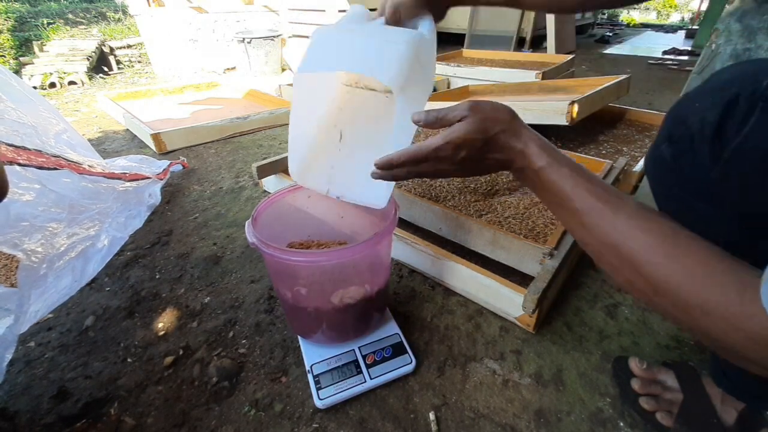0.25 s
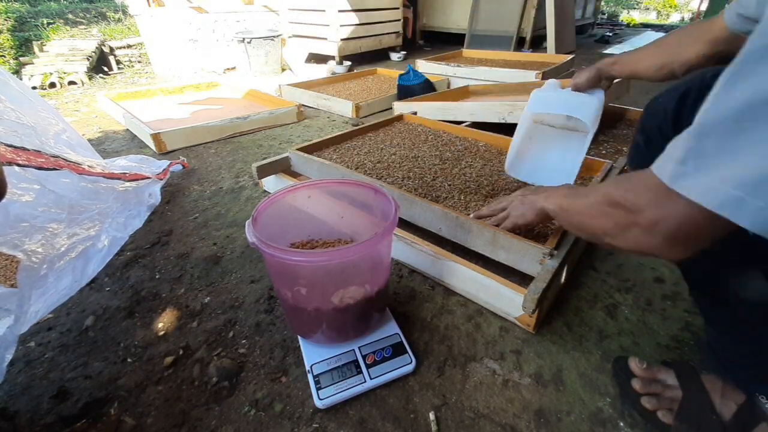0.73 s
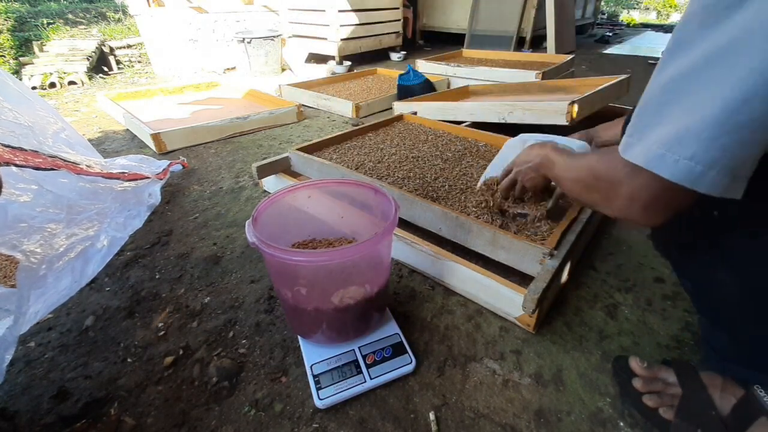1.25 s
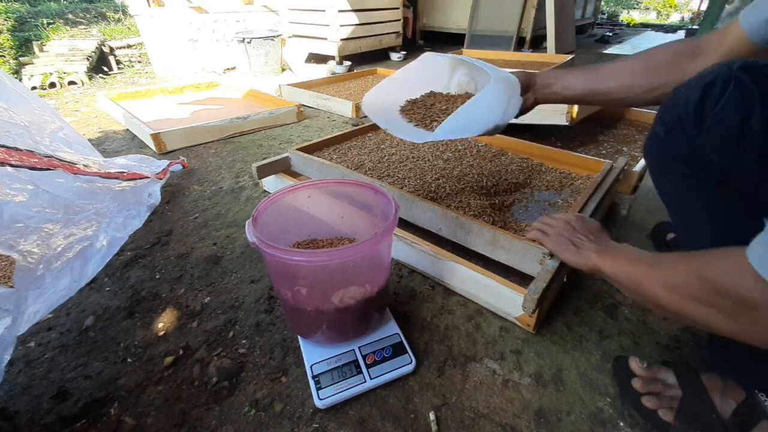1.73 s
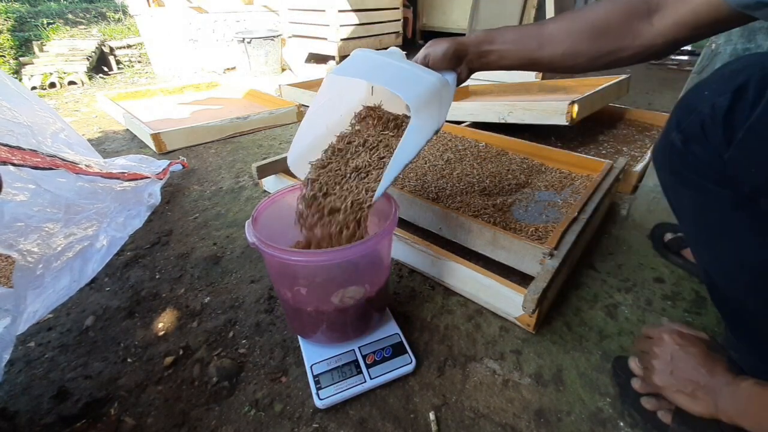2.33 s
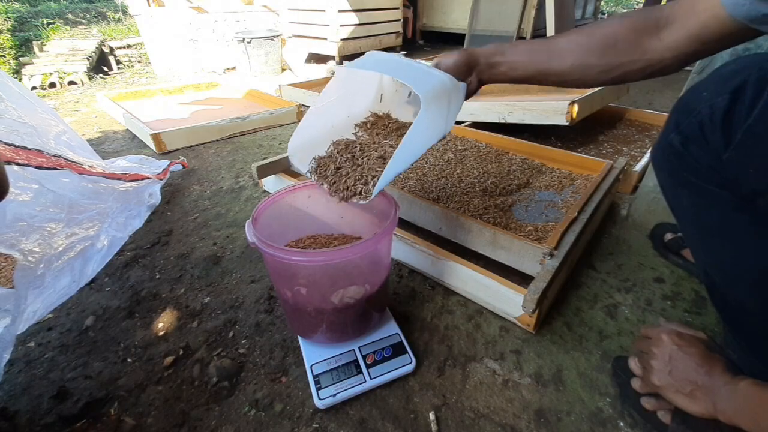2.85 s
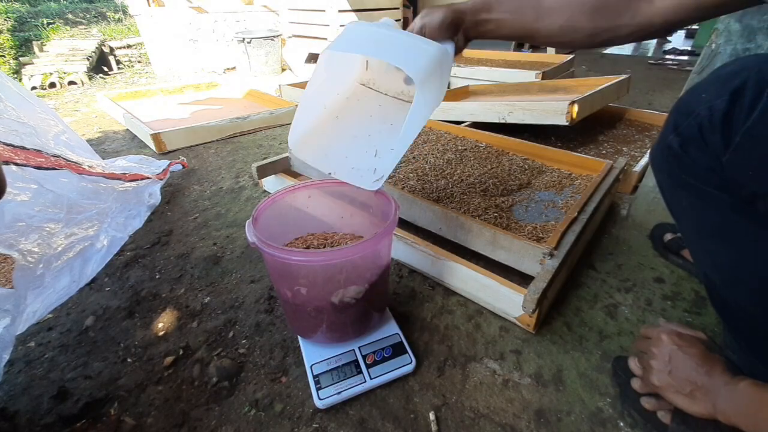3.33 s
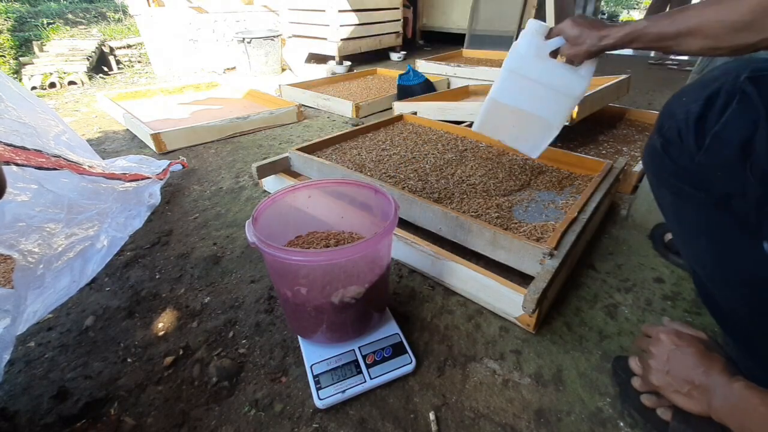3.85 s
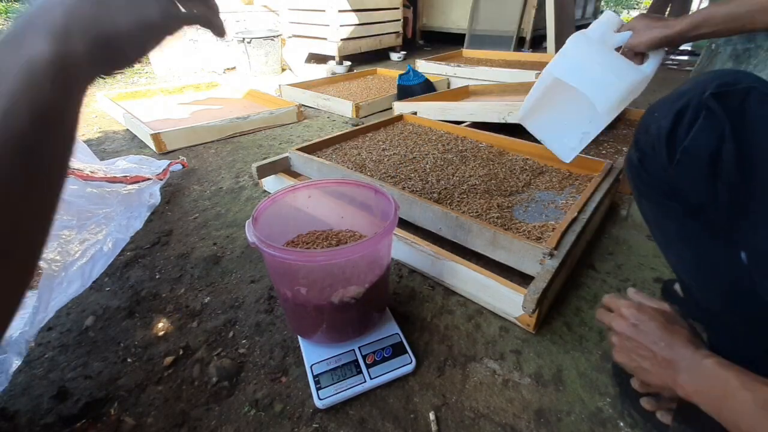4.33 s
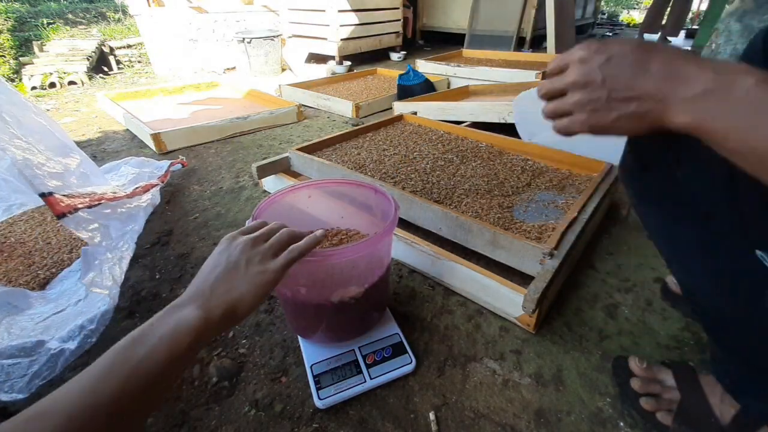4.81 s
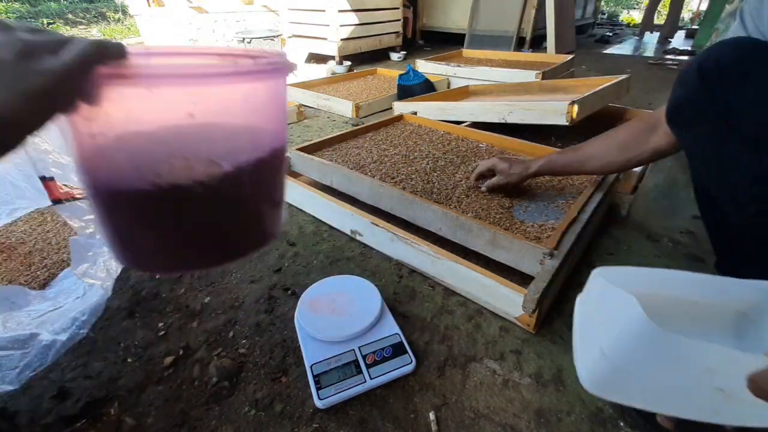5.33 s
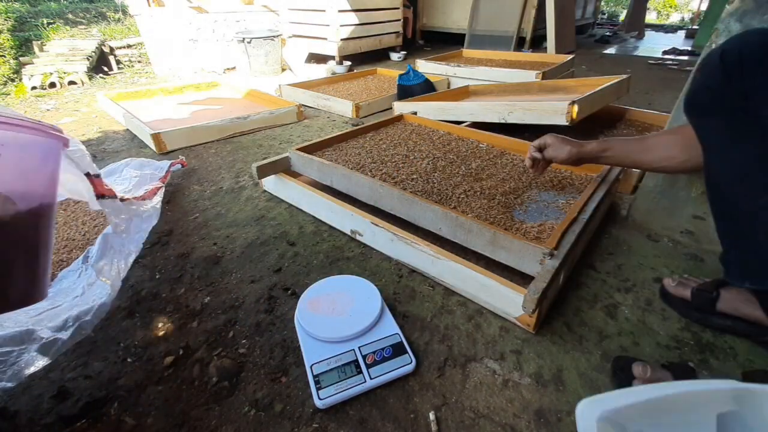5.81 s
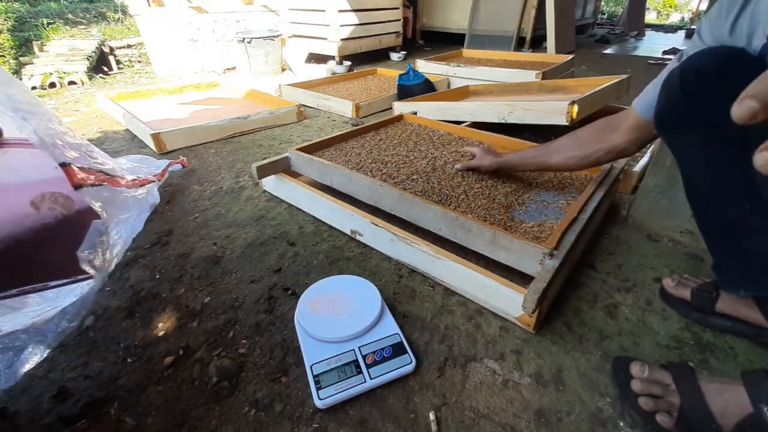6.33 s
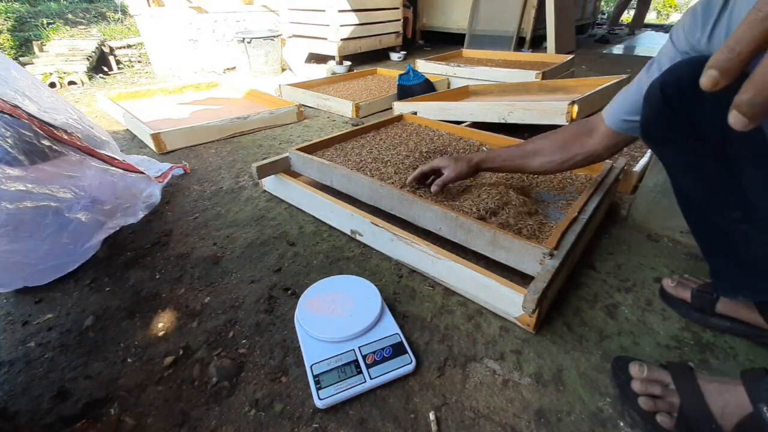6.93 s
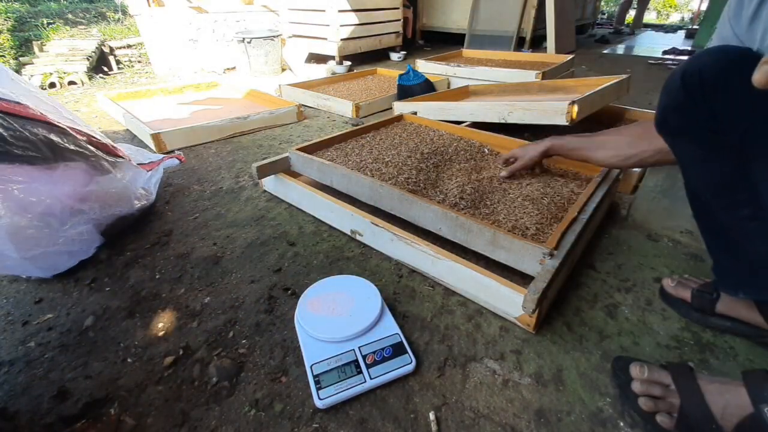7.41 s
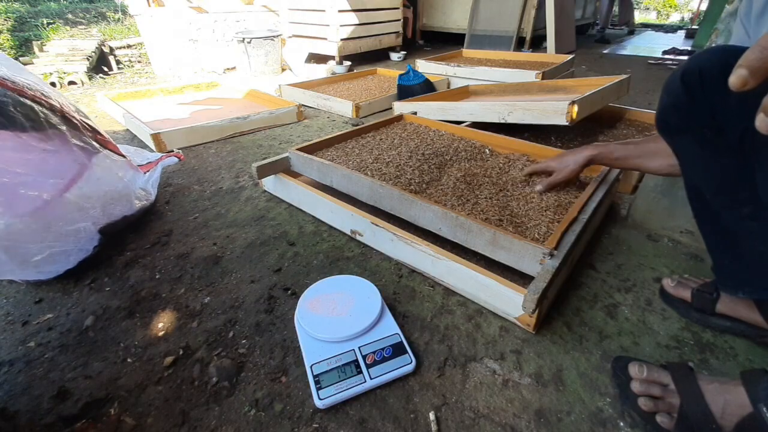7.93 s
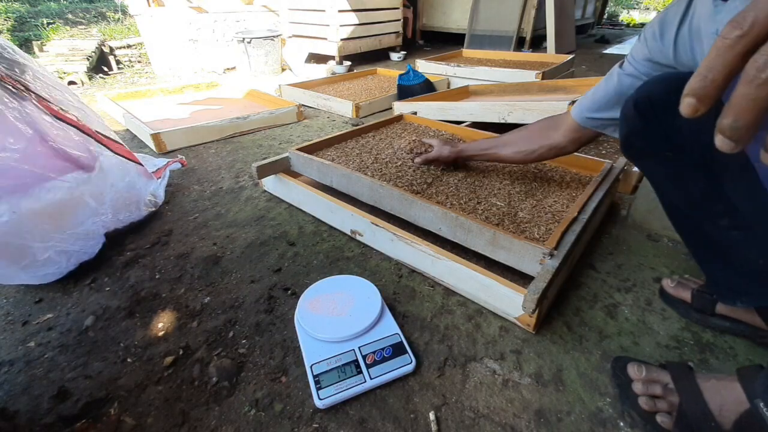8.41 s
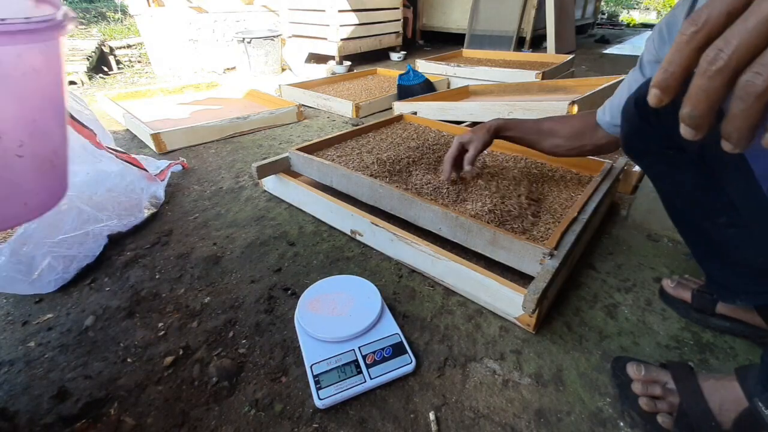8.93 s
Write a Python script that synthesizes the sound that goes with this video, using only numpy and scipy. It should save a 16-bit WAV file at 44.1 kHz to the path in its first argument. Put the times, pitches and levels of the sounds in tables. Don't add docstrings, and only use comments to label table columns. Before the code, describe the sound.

A hollow plastic jug scoops and pours dry rustling worms, then plastic clunks loudly before hands stir with crisp, gritty rustling over a faint outdoor machine drone.

```python
import sys
import numpy as np
from scipy import signal
from scipy.fft import rfft, irfft, next_fast_len
from scipy.io import wavfile
from scipy.ndimage import uniform_filter1d

SR = 44100
rng = np.random.default_rng(int(sys.argv[2]) if len(sys.argv) > 2 else 0)


def digitize_waveform(pressure):
    field = np.atleast_2d(pressure).T
    bounded = np.clip(field, -1, 1)
    quanta = np.round(bounded * 32767).astype(np.int16)
    wavfile.write(sys.argv[1], SR, quanta)


def invert_db(level):
    return 10 ** (np.asarray(level, dtype=float) / 20)


N = 404075
TIME = np.arange(N) / SR


def evened(x):
    return x / np.sqrt(np.mean(x ** 2) + 1e-20)


def wander(*spans):
    drift = rng.standard_normal(N)
    for span in spans:
        drift = uniform_filter1d(drift, span)
    return evened(drift)


def read(points, hz):
    f, value = np.transpose(points)
    return np.interp(np.log(hz + 1), np.log(f + 1), value)


def column(rows, index):
    return np.interp(TIME, *np.vstack(rows).T[[0, index]])


def panned(x, pan_db):
    return x * invert_db(np.array([pan_db / 2, -pan_db / 2]).reshape(2, -1))


def add(mix, s, sound):
    part = mix[:, max(round(s * SR), 0):][:, :sound.shape[1]]
    part += sound[:, :part.shape[1]]


def coloured(x, points):
    size = next_fast_len(x.shape[-1])
    gain = invert_db(read(points, np.fft.rfftfreq(size, 1 / SR)))
    return irfft(rfft(x, size) * gain, size)[..., :x.shape[-1]]


def resonate(x, hz, width):
    turn = np.exp(2j * np.pi * np.cumsum(hz * np.ones(x.shape[-1])) / SR)
    r = np.exp(-np.pi * width / SR)
    return 2 * (turn * signal.lfilter([1 - r], [1, -r], x / turn)).real


def pair(x, same):
    same = np.clip(same, -1, 1)
    return np.array([x[0], same * x[0] + np.sqrt(1 - same ** 2) * x[1]])


# pitch_hz, level_db (per Hz)
AIR = [(20, -35), (31, -30), (50, 9.5), (200, 5), (400, -5.5), (630, -13.5), (1000, -22.5), (2000, -36.5),
       (4000, -32), (8500, -27), (12000, -29.5), (14000, -45), (16500, -38)]
# pitch_hz, likeness (-1 to 1)
AIR_LIKENESS = [(60, .92), (300, .75), (1000, .2), (3000, -.1), (15000, .02)]
# pitch_hz, width_hz, level_db
DRONE = [(48, 41, -8.5), (94, 15, -8.5), (122.8, 12.6, -1), (166.4, 9.8, -7), (258, 14.2, -4),
         (328.2, 26.5, -7)]
# start_s, level_db
DRONE_LEVEL = [(0.0, -39), (0.8, -46.5), (1.0, -43.5), (2.32, -43), (2.5, -46), (3.7, -48.5), (4.1, -50),
               (5.6, -44.5), (6.1, -41.5), (6.7, -49.5), (7.24, -41), (7.6, -43.5), (8.5, -43.5),
               (9.16, -43)]
# pitch_hz, width_hz, level_db
INSECTS = [(6750, 700, -68.5), (11200, 880, -85)]


def yard():
    hz, t, z = signal.stft(rng.standard_normal((2, N + 2048)), SR, nperseg=1024, noverlap=768)
    patches = uniform_filter1d(rng.standard_normal(z.shape[1:]), 12, 0)
    patches = evened(uniform_filter1d(patches, 14, 1))
    z = pair(z, read(AIR_LIKENESS, hz)[:, None]) * invert_db(read(AIR, hz)[:, None] + 1.5 * patches)
    air = invert_db(-54) * evened(signal.istft(z, SR, nperseg=1024, noverlap=768)[1][:, :N])

    push = pair(rng.standard_normal((2, N)), 0.61)
    pitch_drift = 1 + 0.028 * wander(9000, 9000)
    drone = 0
    for hz, width, db in DRONE:
        hum = resonate(resonate(push, hz * pitch_drift, width), hz, 3.8 * width)
        drone = drone + invert_db(db) * evened(hum)
    drone = invert_db(column(DRONE_LEVEL, index=1) - 3.5) * evened(drone)

    hiss = pair(rng.standard_normal((2, N)), 0.13)
    insects = 0
    for hz, width, db in INSECTS:
        insects = insects + invert_db(db) * evened(resonate(resonate(hiss, hz, width), hz, width))
    return air + drone + insects


# start_s, level_db, lowest_hz, swing_hz
CHURR = [(9.055, -76, 4370, 300), (9.06, -63, 4300, 786), (9.064, -58, 3590, 1800),
         (9.08, -53.5, 3580, 1751), (9.1, -55, 3580, 1700), (9.124, -52.5, 3560, 1400),
         (9.13, -58, 3850, 900), (9.16, -69, 3750, 500)]
TRILL_HZ, EDGE_HZ = 168, 3480


def bird():
    turns = np.cumsum(TRILL_HZ + 500. * uniform_filter1d(rng.standard_normal(N), 200)) / SR
    swing = 1 - abs(np.sin(np.pi * turns))
    hz = column(CHURR, index=2) + column(CHURR, index=3) * swing ** 0.98
    level_db = column(CHURR, index=1) - 3 * swing
    note = np.sin(2 * np.pi * np.cumsum(hz) / SR) * (TIME > CHURR[0][0]) * invert_db(level_db)
    echoes = rng.standard_normal((2, 1500)) * np.exp(-np.arange(1500) / 300.0)
    echoes = 1.9 * echoes / np.linalg.norm(echoes[0])
    note = 0.9 * note + signal.oaconvolve(note[None], echoes, axes=1)[:, :N]
    return signal.sosfilt(signal.butter(8, EDGE_HZ, "high", fs=SR, output="sos"), note)


# start_s, pitch_hz, level_db
SQUEAKS = [
    [(3.365, 11369, -78), (3.375, 11345, -69), (3.417, 11502, -69), (3.47, 10638, -81)],
    [(5.11, 11600, -73), (5.14, 12100, -70), (5.17, 11700, -70), (5.215, 11200, -76)],
    [(4.945, 1310, -79), (4.97, 1330, -78), (5.005, 1310, -74)],
    [(0.742, 15600, -80), (0.76, 15650, -81), (0.785, 15600, -84)],
    [(0.85, 15650, -78), (0.862, 15500, -75), (0.88, 15550, -80)],
    [(9.044, 2950, -78), (9.05, 3000, -68.5), (9.056, 3050, -77), (9.085, 3100, -83)],
]


def squeak(rows):
    jitter = 1 + .08 * uniform_filter1d(rng.standard_normal(N), 90)
    tone = np.sin(2 * np.pi * np.cumsum(column(rows, index=1) * jitter) / SR)
    gate = np.clip(np.minimum(TIME - rows[0][0], rows[-1][0] - TIME) / .008, 0, 1)
    return panned(tone * gate * invert_db(column(rows, index=2) + 6.5), .5)


def scrape(s, db, hz, length_s, shares):
    t = np.arange(6000) / SR
    grit = pair(rng.standard_normal((2, len(t))) * invert_db(0.5 * rng.exponential(1, len(t))), 0.67)
    grit = evened(resonate(resonate(grit, hz, shares[0] * hz), hz, shares[1] * hz))
    return s, invert_db(db) * grit * np.minimum(t / 0.0016, 1) * np.exp(-(t / length_s) ** 2)


# start_s, level_db, pitch_hz,
# length_s
RIM_SCRAPES = [(0.029, -51, 620, 0.033), (0.346, -49, 905, 0.012), (0.402, -55, 980, 0.026),
               (0.501, -57, 1150, 0.0063), (0.78, -68, 1490, .02), (0.854, -50, 1430, .02),
               (0.87, -49.5, 504, 0.13), (0.985, -46.5, 1460, 0.043), (1.042, -52, 1900, 0.027),
               (3.311, -58, 1500, 0.024), (4.155, -32, 1050, 0.009), (6.108, -36, 1510, 0.0097),
               (6.109, -32.5, 2800, 0.0076), (6.327, -52, 1200, .015), (7.188, -47, 2340, 0.061),
               (7.304, -46.5, 2020, 0.16), (8.094, -58, 1700, 0.057), (8.157, -52, 1200, 0.093)]
# start_s,
# level_db, pitch_hz, length_s
HOLLOW_RUBS = [(0.215, -55, 475, .12), (0.235, -58, 1100, 0.026), (4.57, -24.5, 527, 0.017),
               (4.6, -48, 556, 0.018), (4.69, -43, 157, 0.034), (6.166, -36.5, 500, 0.016),
               (6.222, -50, 460, 0.038), (6.322, -38.5, 470, 0.043), (7.186, -35.5, 329, 0.041),
               (7.288, -40.5, 300, .05), (4.186, -36, 510, 0.033), (4.2, -41.5, 226, 0.036),
               (6.02, -20, 996, .008), (6.047, -31, 400, .022), (5.806, -42, 1170, 0.015),
               (7.2, -40.5, 150, 0.056), (1.003, -53, 900, 0.048), (1.41, -60, 2600, 0.05),
               (7.772, -51, 320, 0.025)]
# start_s, level_db, pitch_hz, length_s
SACK_WHISTLES = [(7.227, -46.5, 2640, 0.042), (7.238, -55, 1350, .03), (7.312, -47, 2750, 0.032),
                 (7.361, -44, 1240, 0.033), (7.361, -46.5, 3250, 0.035), (7.365, -54, 1930, .03),
                 (7.406, -50, 1240, 0.053), (7.408, -52, 2560, 0.031), (7.417, -54, 1900, .025)]


def scrapes(mix):
    broad, narrow, fine = (0.17, 2.6), (0.17, 0.23), (0.035, 0.08)
    for rows, shares in [(RIM_SCRAPES, broad), (HOLLOW_RUBS, narrow), (SACK_WHISTLES, fine)]:
        for row in rows:
            add(mix, *scrape(*row, shares))


def tick(s, peak_db, hz, body_db):
    t = np.arange(1500) / SR
    puff = pair(rng.standard_normal((2, len(t) + 1)), 0.3)[:, 1:]
    edge = resonate(resonate(puff, hz, 0.62 * hz), hz, 2.0 * hz)
    edge = edge * np.minimum(t / 0.002, 1) * (np.exp(-t / 0.0044) + 0.26 * np.exp(-t / 0.006))
    body = resonate(resonate(puff * np.exp(-t / 0.0022), 850.0, 760.0), 970.0, 1220.0)
    sound = edge / abs(edge).max() + invert_db(body_db + 10.5) * body / abs(body).max()
    return s, invert_db(peak_db - 3.5) * sound


# start_s, peak_db, body_db (over the snap)
NAIL_TICKS = [(0.0394, -42, -8), (0.09, -41, -18), (0.1313, -41, -16), (0.2763, -42, -12),
              (0.3527, -29.5, -9.5), (0.4992, -44, -10), (0.905, -38, -22), (1.351, -39, -25),
              (1.801, -34.5, -21), (4.157, -45, -23.5), (4.485, -31, -23), (4.5475, -25, 1.5),
              (4.701, -35.5, -26), (5.214, -34, -35), (5.5244, -33, -20), (5.7603, -31.5, -18),
              (6.201, -31.5, -23), (6.318, -34, -19), (6.353, -31, -25), (7.7274, -28.5, -15)]
WALL_TICKS = [(1.0022, -44, -4), (1.113, -44.5, 9.5), (4.158, -28.5, 1), (4.6463, -35, 6), (5.011, -42, -8),
              (5.092, -50.5, 11.5), (5.446, -29, -23), (5.718, -34.5, -15), (6.0224, -19.5, 9.5),
              (6.109, -30, 11.5), (6.328, -39, 8), (7.189, -29, -23), (7.783, -37, -11), (8.092, -33, -21)]
SACK_TICKS = [(1.918, -35, -23), (4.769, -30.5, -47), (5.6292, -33.5, -23), (8.7123, -23, -19),
              (8.965, -41.5, -22.5)]


def ticks(mix):
    for hz, rows in [(7460, NAIL_TICKS), (2830, WALL_TICKS), (10900, SACK_TICKS)]:
        for s, peak_db, body_db in rows:
            add(mix, *tick(s, peak_db, hz, body_db))


def blow(modes, s, peak_db, crack_db, damping, rattle_s, push_db):
    t, lead = np.arange(7000) / SR, .02
    late, early = np.maximum(t - lead, 0), np.maximum(lead - t, 0)
    ring = 0
    for hz, db, t60 in modes:
        swell = 1 - np.exp(-.9 * hz * t)
        detune = rng.uniform(0.99, 1.01) + rng.normal(0, hz * .4e-5, (2, 1))
        ring = ring + invert_db(db - 60 * t * damping / t60) * swell * np.sin(2 * np.pi * hz * detune * t)
        ring = ring + invert_db(db - 12 - 58 * t * damping / t60) * swell * np.sin(2 * np.pi * hz * .96 * t)
    full = np.exp(-((late - 0.1483 * rattle_s) / 0.00021) ** 2)
    rattle = 0.1 * rng.standard_normal(len(t)) * np.exp(-early / 0.0084 - late / rattle_s)
    ring = signal.fftconvolve(ring, (full + rattle)[None], axes=1)[:, :len(t)]
    lowest_hz = modes[0][0]
    ring = signal.sosfilt(signal.butter(2, 0.5 * lowest_hz, "high", fs=SR, output="sos"), ring)
    ring = ring * (1 + 0.95 * np.exp(-late / 0.0089))
    dipped = signal.lfilter(*signal.iirnotch(762, 3.5, SR), ring)
    ring = ring + 0.92 * (dipped - ring)

    push = np.exp(-early / 0.0057 - late / 0.013) * np.sin(2 * np.pi * 0.65 * lowest_hz * (t - lead))
    crack = pair(rng.standard_normal((2, len(t))), 0.44) * np.exp(-early / 0.00051)
    crack = crack * (np.exp(-late / 0.0037) + 0.13 * np.exp(-late / 0.014))
    crack = coloured(crack, [(400, 2), (1200, 12.5), (3000, 8.5), (8000, 3.5), (16000, -13.5)])
    sound = ring / abs(ring).max() + invert_db(push_db) * push + invert_db(crack_db) * crack
    return s - lead, panned(invert_db(peak_db) * sound, 0.4)


def strike(mix, modes, rows, rattle_s, push_db):
    for row in rows:
        add(mix, *blow(modes, *row, rattle_s, push_db))


# pitch_hz, level_db, decay_s (60 dB)
TRAY = [
    (76.5, 12, 0.051),
    (150.4, 9.5, 0.048),
    (257, -4, 0.082),
    (428, -11.5, 0.17),
    (629, -21, 0.25),
    (1144, -17, 0.046),
]
# start_s, peak_db, crack_db (over the ring), damping (factor)
TRAY_BLOWS = [(0.778, -38.5, -34, 2.3), (1.003, -35, -36, 1.9), (1.402, -19, -41, 1.3),
              (3.824, -38.5, -14, 0.3), (4.15, -23.5, -45, .6), (4.225, -42, -43, 0.45),
              (4.274, -37.5, -45, .6), (4.536, -28.5, -45, 0.62), (6.191, -42, -45, 0.32)]


def tray(mix):
    strike(mix, TRAY, TRAY_BLOWS, rattle_s=0.0111, push_db=-13.5)


# pitch_hz, level_db, decay_s (60 dB)
TUB = [(160, -7.5, 0.24), (265, -13.5, 0.09), (360, -4.5, 0.099), (402, 1, 0.2), (490, 7.5, 0.11),
       (627, -13.5, 0.17), (985, -15, 0.033), (1140, -7, 0.072), (1180, -25, .045), (1400, -21, 0.06),
       (1700, -9, 0.039), (2340, -14, 0.04)]
TUB_RIM = [(302, -9, .08), (400, -8.5, 0.17), (479, -0.5, 0.081), (620, -4.5, 0.067), (787, -5.5, .07),
           (1125, -4.5, 0.044), (1360, -3.5, .04), (1795, -20, 0.046), (3100, -26, .02)]
LID = [(127, -13.5, 0.13), (287, -3.5, 0.048), (470, -10, 0.066), (810, -9, 0.044), (1180, -17, 0.018),
       (1674, -21, .05)]
# start_s, peak_db, crack_db (over the ring), damping (factor)
TUB_BLOWS = [
    (5.984, -28.5, -40, 0.54),
    (6.001, -26.5, -32, 1.2),
    (6.024, -5, -18.5, 1.74),
    (6.045, -24, -40, 0.66),
    (6.168, -34.5, -30, 2.4),
    (6.224, -37, -28, 0.63),
    (6.283, -35, -30, 1.8),
]
RIM_BLOWS = [
    (6.1, -29, -35, 1.4),
    (6.11, -13, -48, 1.6),
    (6.121, -37, -38, 1.1),
]
LID_BLOWS = [
    (5.803, -31, -40, 1.5),
    (5.812, -24, -40, 1.6),
]


def tub(mix):
    for modes, rows in [(TUB, TUB_BLOWS), (TUB_RIM, RIM_BLOWS), (LID, LID_BLOWS)]:
        strike(mix, modes, rows, rattle_s=0.01347, push_db=-39)


# pitch_hz, level_db, decay_s (60 dB)
JUG_SIDE = [(152, 0.5, 0.16), (313, 1, 0.076), (403, 1.5, 0.14), (491, 5.5, 0.12), (550, -17, 0.13),
            (984, -18, 0.077), (1184, -11.5, 0.09), (1645, -19, 0.049), (1760, -20, 0.073),
            (2350, -33, .05)]
JUG_BASE = [(122.7, -4, 0.071), (190, -4.5, 0.085), (238, -5.5, 0.087), (300, -5, 0.094), (398, -3.5, 0.17),
            (502, -5.5, 0.073), (556, 2.5, 0.11), (685, -11, .08), (855, -10, 0.11), (1065, -18, 0.073),
            (1123, -5, 0.043), (1200, -8.5, 0.054), (1580, -15, 0.072), (1955, -11, 0.04)]
JUG_HEEL = [(210, -3.5, 0.082), (314, -6.5, 0.1), (490, -5.5, 0.11), (542, -2, 0.11), (840, -23, 0.04),
            (1100, -7.5, 0.059), (1604, -26, 0.061), (2010, -7, 0.036)]
# start_s, peak_db, crack_db (over the ring), damping (factor)
SIDE_BLOWS = [(0.855, -29.5, -26, 2.1), (1.048, -41, -15, 1.2), (1.115, -29, -10.5, 2.3),
              (4.161, -10, -18, 1.2), (4.172, -18, -20, 1.6), (5.016, -30.5, -23, 1),
              (5.032, -36, -24, 1.7), (5.046, -46, -19, 2.3), (6.326, -36, -29, 1.1),
              (6.35, -29.5, -31, 5.1)]
BASE_BLOWS = [
    (1.362, -35, -35, 3.6),
    (4.548, -5, -22, 1.2),
    (4.572, -29, -38, 0.82),
    (4.585, -35, -33, 1.5),
    (0.098, -52, -45, 1.5),
    (0.122, -52, -45, 1.5),
    (8.443, -43, -8, 0.77),
]
HEEL_BLOWS = [
    (4.647, -12.5, -23.5, 1.28),
    (0.5, -43.5, -33, 1),
    (5.093, -40, -20, 1.8),
]


def jug(mix):
    strike(mix, JUG_SIDE, SIDE_BLOWS, rattle_s=0.0139, push_db=-15)
    for modes, rows in [(JUG_BASE, BASE_BLOWS), (JUG_HEEL, HEEL_BLOWS)]:
        strike(mix, modes, rows, rattle_s=0.01024, push_db=-17)


# start_s (of the peak), level_db (dull slide), bright_db, rise_s, fall_s
SCOOPS = [(0.0, -58, -3.5, .1, 0.74), (0.25, -67, -6, 0.054, 0.047), (0.284, -61.5, 3.5, 0.092, 0.1),
          (0.356, -54, 4, 0.0085, 0.11), (0.794, -59, -2.5, 0.02, 0.06), (0.9, -57, -2.5, 0.042, 0.39),
          (1.1, -48.5, -3, 0.21, 0.083), (1.255, -53, 0, 0.55, 0.09), (1.61, -58.5, 2, 0.48, 0.066),
          (3.32, -69, -12, 0.054, 0.032), (3.86, -57, 1, 0.12, 0.86), (4.12, -62.5, 9, 0.65, 0.072),
          (4.2, -48, 1.5, 0.19, 0.069), (4.3, -53.5, 3.5, 0.27, 1), (5.036, -45.5, -4, 0.022, 0.037),
          (5.094, -57, -4, 0.0078, 0.15), (6.33, -42, -26, 0.028, 0.14)]
POURS = [(1.44, -41, 2, 0.14, 0.075), (2.19, -56.5, 5, 0.064, 0.5), (2.27, -54.5, 3.5, 0.38, 0.26),
         (2.32, -47, 0.5, 0.36, 0.21), (2.45, -71, 3, 0.16, 0.22), (2.92, -70, 6, 0.12, 0.04),
         (3.07, -50.5, -2, 0.045, 0.23), (3.12, -47.5, 2.5, 0.12, 0.16), (3.17, -46.5, 4, 0.18, 0.14),
         (3.22, -54, 6, 0.17, 0.085)]
STIRS = [(5.46, -48.5, 3.5, 0.084, 0.1), (5.86, -46.5, -2, 0.22, 0.17), (5.93, -41.5, -9, 0.068, 0.047),
         (6.03, -44.5, -0.5, 0.24, 0.16), (6.21, -49.5, -4, 0.072, 0.29), (6.44, -48, -1.5, 0.17, 0.2),
         (7.016, -44.5, -2.5, 0.37, 0.42), (7.21, -40.5, -5.5, 0.036, 0.32),
         (7.42, -45.5, -0.5, 0.52, 0.11), (7.656, -49, -1.5, 0.3, 0.094), (7.826, -48.5, -2, 0.18, 0.29),
         (7.96, -53, -1.5, 0.12, 0.061), (8.052, -45, -2.5, 0.017, 0.03), (8.104, -43, -4.5, 0.041, 0.057),
         (8.3, -52.5, 4.5, 0.45, 0.95), (8.46, -38, -1.5, 0.23, 0.14), (8.512, -39, -0.5, 0.1, 0.4),
         (8.715, -41, -5, 0.019, 0.067), (8.89, -52, 1.5, 0.39, 0.076), (8.976, -53, -6, 0.025, 0.033)]
BRUSHES = [(1.74, -70, 2.5, 0.03, 0.36), (1.82, -65, 0.5, 0.19, 0.21), (1.96, -71, -1, 0.13, 0.04),
           (1.92, -76, 12.5, 0.012, 0.039), (3.72, -67, 1, 0.38, 0.25), (4.53, -69, 0, 0.048, 0.4),
           (4.72, -71.5, 3.5, 0.08, 0.33), (4.87, -68, 1.5, 0.12, 0.037), (5.68, -66, 1.5, 0.096, 0.31),
           (6.37, -54, 1, 0.023, 0.026), (5.274, -59.5, 1, 0.12, 0.1)]
# fizz_db and crisp_db over the slide, lean (crisp dB per dB of brightness)
SCOOP_SKIN, POUR_SKIN = (-7, -12.5, 1.7), (-7, -15, 1.7)
STIR_SKIN, BRUSH_SKIN = (-3, -4.5, 1.27), (3.7, 2.7, 2.2)
SLOPE_DB, BEND = 20, 0.99
HANDS_LIFT_S, LIFT_S, LIFT_DB = 8.98, 0.018, -5


def strokes():
    t, power = TIME[::64], 1e-11
    for rows, (fizz_db, crisp_db, lean) in [(SCOOPS, SCOOP_SKIN), (POURS, POUR_SKIN),
                                            (STIRS, STIR_SKIN), (BRUSHES, BRUSH_SKIN)]:
        s, db, bright_db, rise, fall = np.transpose(rows)[..., None]
        level_db = db - SLOPE_DB * np.maximum((s - t) / rise, (t - s) / fall) ** BEND
        layers_db = level_db + np.array([0 * db, fizz_db + bright_db, crisp_db + lean * bright_db])
        power = power + (invert_db(layers_db) ** 2).sum(axis=1)
    lift = invert_db(LIFT_DB * np.clip((TIME - HANDS_LIFT_S) / LIFT_S, 0, 1))
    return [lift * np.interp(TIME, t, np.sqrt(p)) for p in power]


def grains(per_s, spread_db, same):
    sizes = invert_db(spread_db * np.minimum(rng.exponential(1, (2, N)), 5))
    hits = sizes * (rng.random((2, N)) < per_s / SR)
    return pair(hits * rng.choice([-1., 1.], (2, N)), same)


# pitch_hz, level_db (per Hz)
SLIDE = [(210, 0.5), (350, 5.5), (526, -2), (577, 1), (744, -5), (980, -3.5), (1340, -6), (2280, -7),
         (4000, -14.5), (5200, -19.5), (8800, -120)]
FIZZ = [(1200, -3.5), (2500, 3.5), (4000, 3.5), (7500, 6), (9000, -5.5), (12000, -37)]
CRISP = [(5000, -23.5), (8500, -6), (12000, 5), (14000, -3), (15800, -3), (16500, -43)]
# start_s, pan_db (left minus right)
HANDS_PAN = [(0.0, .6), (1.58, 0.3), (1.89, -2.5), (2.19, 1.5), (5.1, 0.8), (5.5, 5.5), (5.74, 1.3),
             (8.29, 2), (9.16, 1)]


def worms():
    clumps_db = 1.2 * wander(1100)
    dull, dry, sharp = strokes() * invert_db(clumps_db + 2.0)
    slide = coloured(grains(6000., 2.37, 0.12), SLIDE)
    hollow_hz = 1400.0 * 1.33 ** wander(4000, 4000)
    slide = evened(slide + 1.09 * resonate(slide, hollow_hz, 190.0)) * dull
    patter = grains(14000., 3.2, 0.013)
    fizz = evened(coloured(patter, FIZZ)) * dry
    crisp = evened(coloured(patter, CRISP)) * sharp
    return panned(slide + fizz + crisp, column(HANDS_PAN, index=1))


def shed(x):
    t = np.arange(8000) / SR
    tail = pair(rng.standard_normal((2, 8000)), 0.78)
    tail = tail * invert_db(-60 * t / 0.1) * np.clip((t - .004) / 0.00089, 0, 1)
    tail = coloured(tail, [(100, 5.5), (1000, -1.0), (4000, -5.5), (16000, -7.5)])
    return signal.fftconvolve(x, tail / np.linalg.norm(tail[0]), axes=1)[:, :N]


def spaced(x):
    at_sack = (TIME > 6.55) & (TIME < 7.95)
    left_lag = np.where(at_sack, -15, 7)
    return np.array([x[0, np.clip(np.arange(N) - left_lag, 0, N - 1)], x[1]])


def scene():
    knocks = np.zeros((2, N))
    for play in [scrapes, ticks, tray, tub, jug]:
        play(knocks)
    handling = spaced(knocks + worms()) + invert_db(-15.0) * shed(knocks)
    return yard() + bird() + sum(map(squeak, SQUEAKS)) + handling


def roll_off(x):
    return signal.sosfilt(signal.butter(12, 16800, fs=SR, output="sos"), x)


# pitch_hz, level_db (of the side signal)
WIDTH = [(50, -3), (110, -2.5), (220, 3), (700, 0.5), (1300, 1), (2500, -0.5), (8000, 0.5)]


def record(dry):
    mid, side = (dry[0] + dry[1]) / 2, coloured((dry[0] - dry[1]) / 2, WIDTH)
    highpass = signal.butter(4, 42., "high", fs=SR, output="sos")
    cut = signal.sosfilt(highpass, np.array([mid + side, mid - side]))
    lowpass = signal.firwin(1023, 15830, window=("kaiser", 8), fs=SR)
    low = signal.oaconvolve(cut, lowpass[None], "same")
    mix = low + invert_db(-38) * (cut - low)
    return roll_off(mix)


dry = scene()
out = record(dry)
digitize_waveform(out)
```